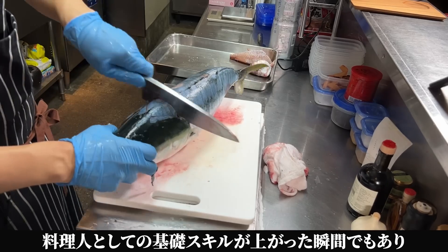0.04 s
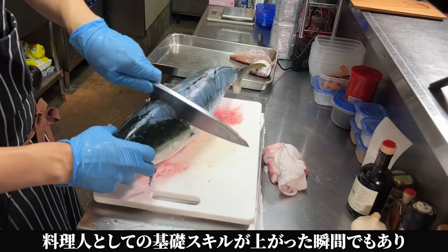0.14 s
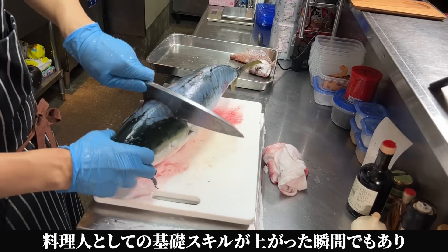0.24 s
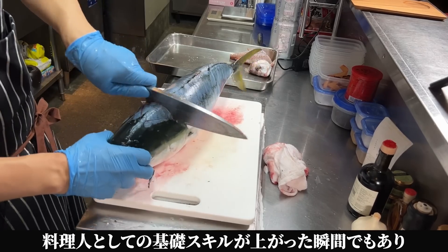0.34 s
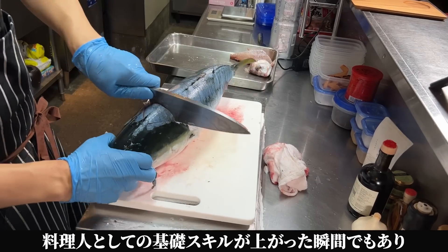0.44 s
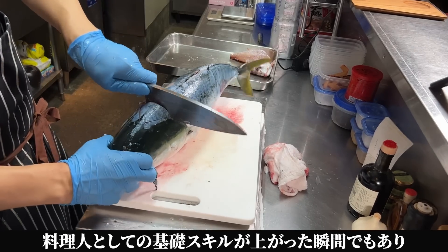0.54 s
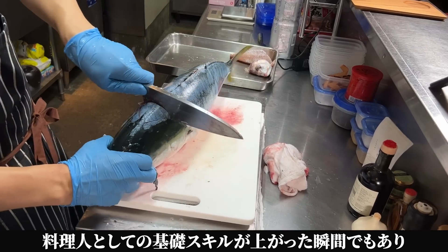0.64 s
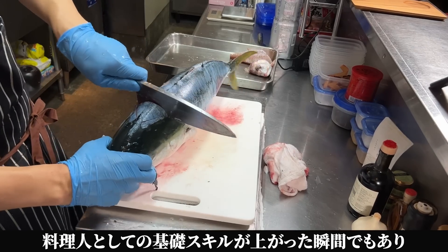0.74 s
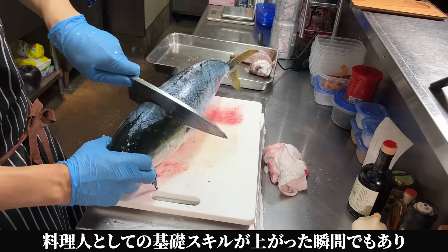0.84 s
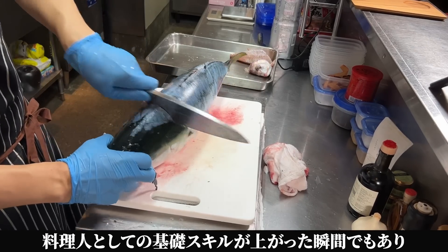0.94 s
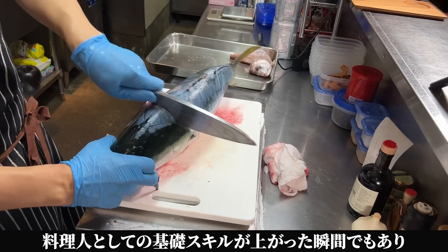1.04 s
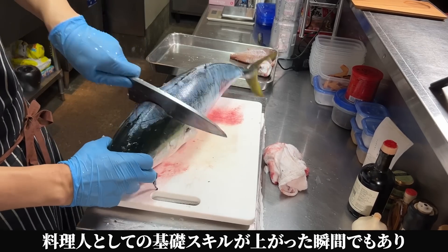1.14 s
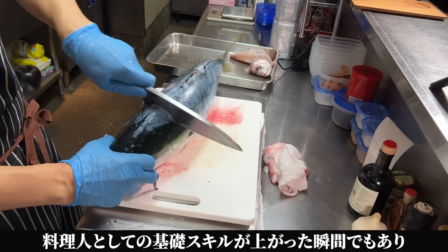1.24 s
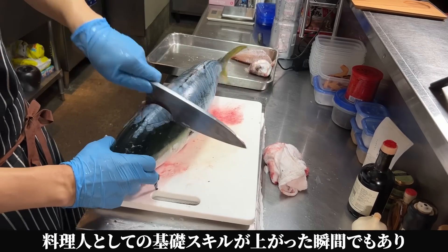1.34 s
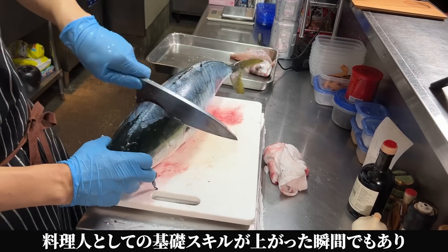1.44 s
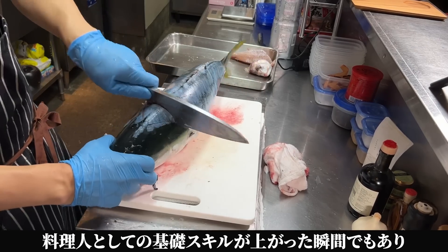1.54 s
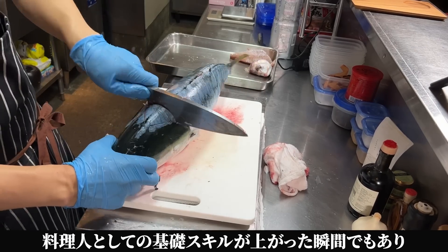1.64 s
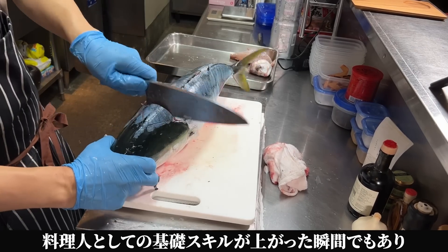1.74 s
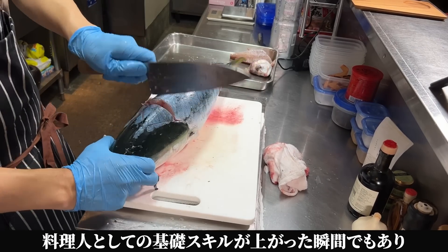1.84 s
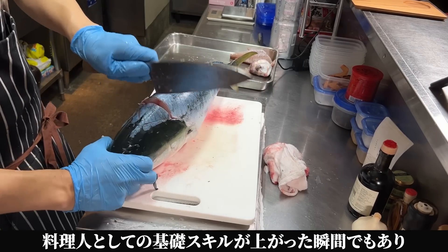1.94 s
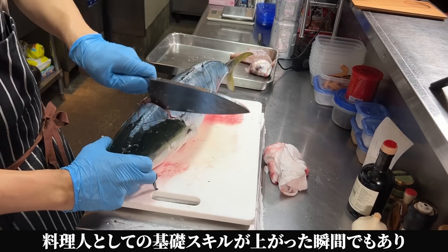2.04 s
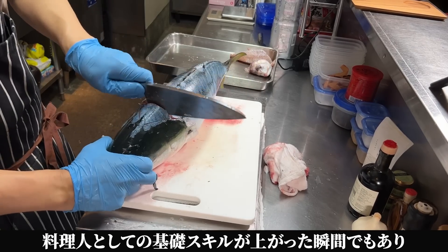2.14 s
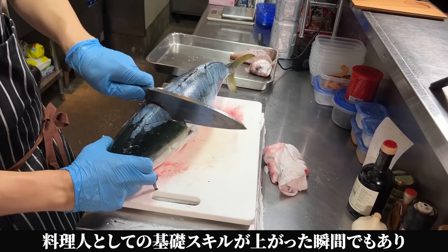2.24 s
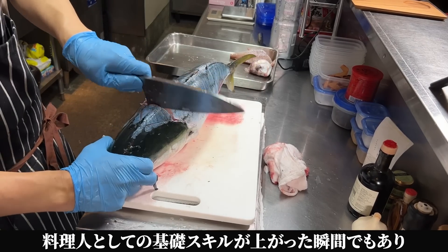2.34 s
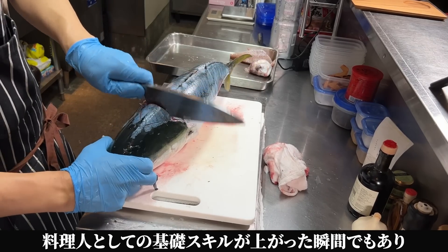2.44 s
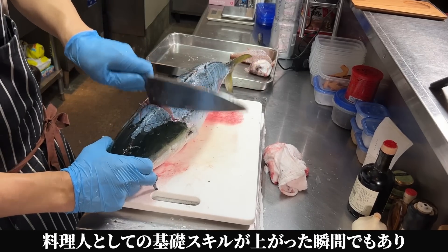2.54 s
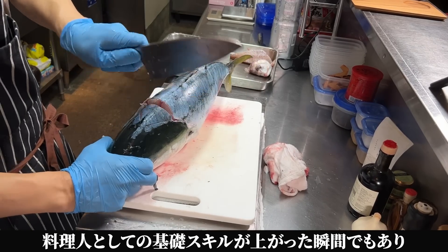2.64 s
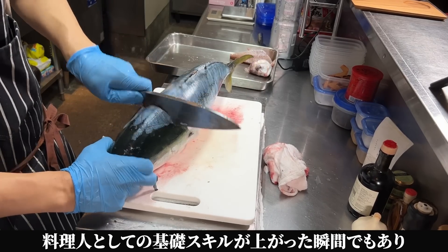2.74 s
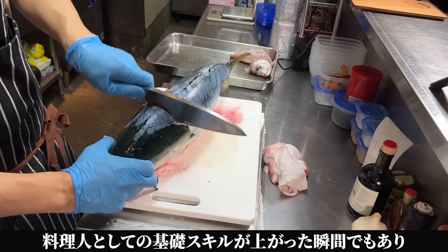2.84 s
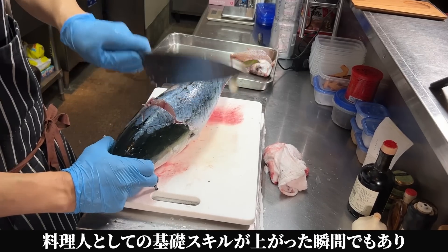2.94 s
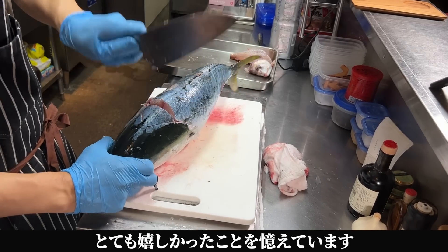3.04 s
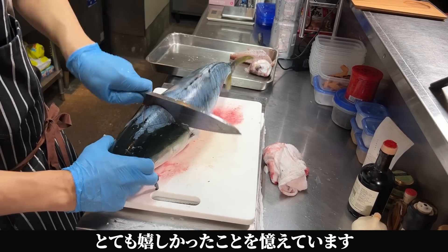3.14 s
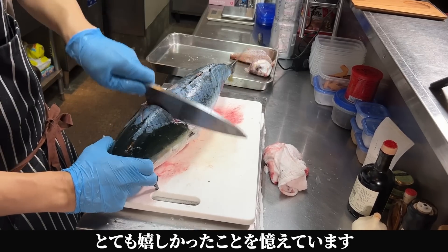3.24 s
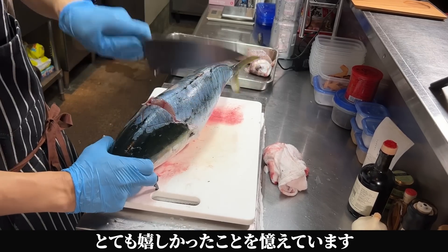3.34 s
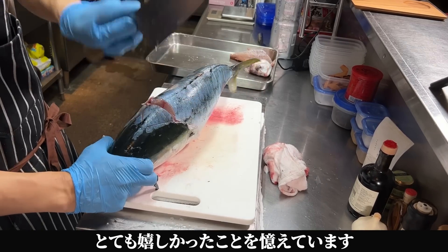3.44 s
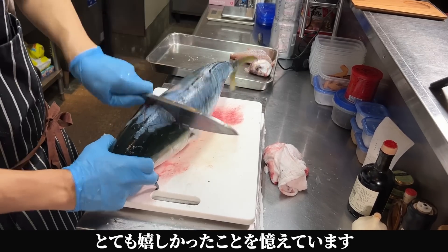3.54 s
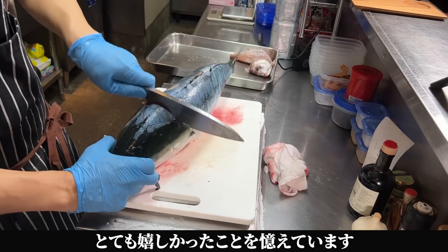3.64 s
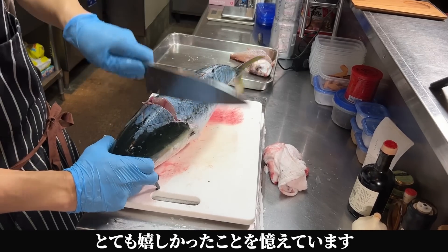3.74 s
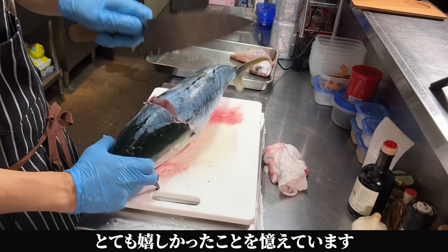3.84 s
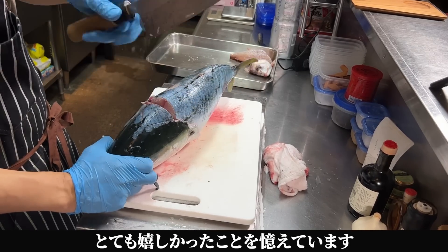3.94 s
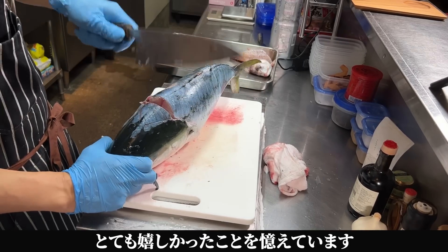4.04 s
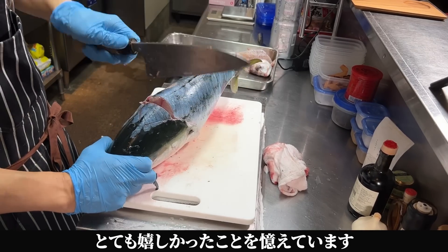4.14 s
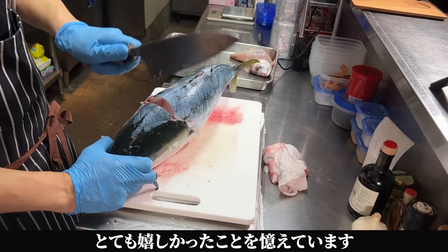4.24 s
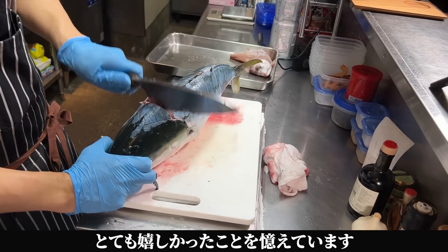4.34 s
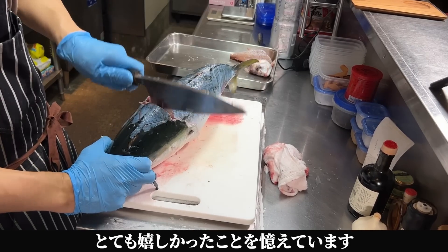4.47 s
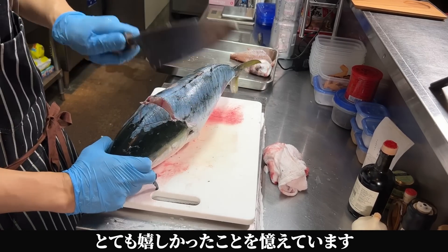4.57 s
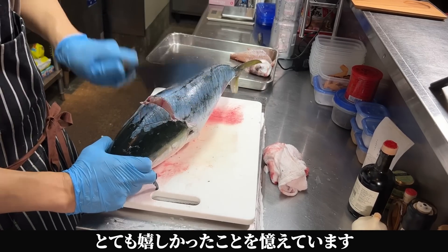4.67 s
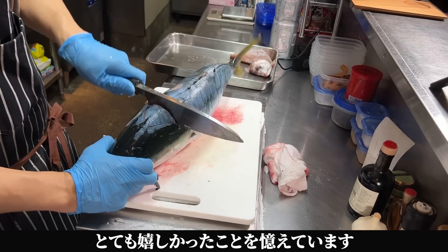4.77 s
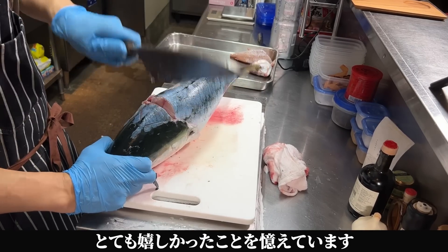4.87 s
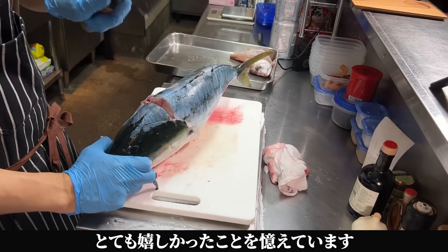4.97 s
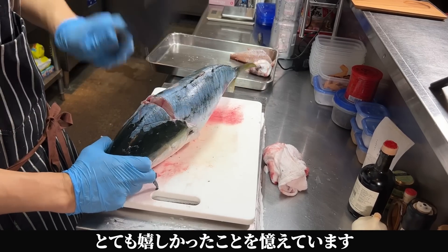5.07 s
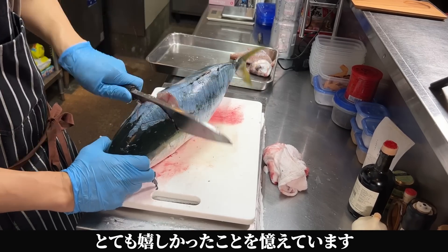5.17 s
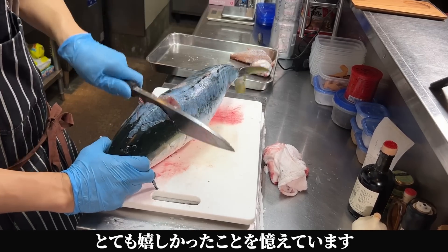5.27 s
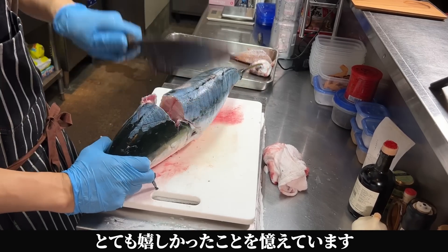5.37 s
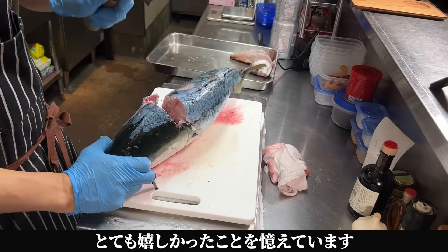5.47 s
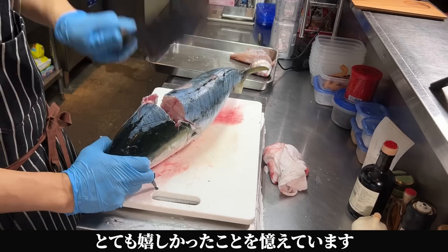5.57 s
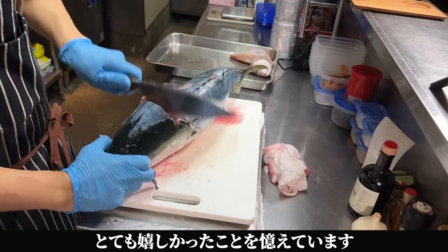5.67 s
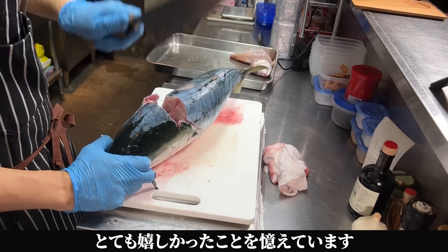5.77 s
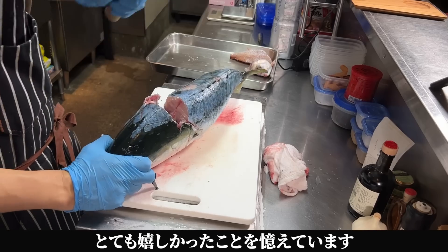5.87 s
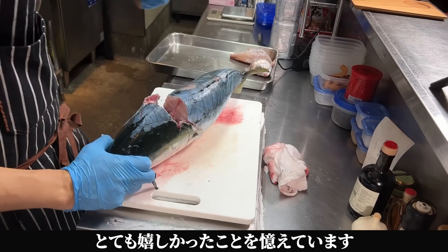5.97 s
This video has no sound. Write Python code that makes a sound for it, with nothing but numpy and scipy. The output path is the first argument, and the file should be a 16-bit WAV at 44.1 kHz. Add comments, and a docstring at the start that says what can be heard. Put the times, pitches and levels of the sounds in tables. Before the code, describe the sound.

A low refrigerator hum and the soft rush of an extractor fan run throughout in a small hard-walled kitchen. From about 0.3 to 1.5 seconds, a knife blade makes faint wet ticks and short scrapes on fish skin, with a soft nudge on the board near 1.1 and another tick at 2.5. Three close, hard chops crack into the backbone at 2.7, 3.1 and 3.5 seconds, growing louder. A faint scrape follows near 4.0, then a tick and light knock at 4.4. Three more chops land at 4.7, 5.1 and 5.6 seconds. Those at 3.5 and 5.1 are the loudest; the last is thinner, with little weight. Each chop is a sharp splintering crack with a wet slap, a quick dull clatter of the plastic board and a low thump and shudder from the steel counter, fading in a short room echo.

```python
"""Six hard, cracking chops of a heavy kitchen knife through the backbone of a large fish.
Before and between them the blade ticks and scrapes on wet skin. Each blow splinters bone, thumps the
fish on a plastic board, makes the board clatter and sets the steel counter swaying. Behind it all, a
refrigeration motor hums and an extractor fan rushes in the small hard-walled kitchen."""
import sys
import numpy as np
from scipy import signal
from scipy.fft import rfft, irfft, next_fast_len
from scipy.io import wavfile
from scipy.ndimage import uniform_filter1d, map_coordinates

SR = 44100
rng = np.random.default_rng(int(sys.argv[2]) if len(sys.argv) > 2 else 0)


def log_audio(samples):
    """Write samples as a 16-bit WAV file to the path given in sys.argv[1]."""
    # one column per channel
    frames = np.atleast_2d(samples).T
    # limit to full scale, then quantise
    limited = np.clip(frames, -1, 1)
    pcm = np.round(limited * 32767).astype(np.int16)
    wavfile.write(sys.argv[1], SR, pcm)


N = 265041
TIME = np.arange(N) / SR
HIT_TIME = np.arange(SR // 4) / SR

# resonances of the plastic board: pitch_hz, width_hz, level_db
BOARD_MODES = [(252, 74, 0), (376, 120, -1.5), (506, 42, -7), (715, 20, 1), (903, 123, 3), (980, 130, 6.5),
               (1200, 320, -5), (1413, 76, -9.5)]
# tone of splintering bone, also of the flesh under a tick: freq_hz, level_db
SPLINTER_EQ = [(400, -24), (1200, 6.5), (1700, 3.5), (2500, -1), (4500, -2), (6500, -8.5), (9000, -9),
               (15000, -22)]
# tone of a bright snap or wet slap: freq_hz, level_db
SNAP_EQ = [(1000, -4.5), (3500, 1.5), (5500, 2.5), (8000, -5.5), (11000, -4.5), (16000, -11)]
# tone of fish and board knocking: freq_hz, level_db
THUD_EQ = [(80, -12), (190, -3.5), (330, -0.5), (550, -1.5), (1000, 2.5), (1500, -0.5), (2100, -7.5),
           (2900, -4), (4500, -17.5), (15000, -38)]
# strokes through the backbone: start_s, crack_db, rise_s, through_bone_s, far_crack_db, far_ring_hz,
# knock_db, knock_hz, ring_db, ring_hz, snap_db, weight_db, landing_db, bounce_db, board_flight_s
# (knock_db, ring_db and snap_db are offsets from crack_db)
CHOPS = [(2.7422, -21, 0.0044, 0.0085, -18.5, 1580, 7, 783, -11, 3960, 0, -21.5, -29, -27.5, .034),
         (3.1126, -17.5, 0.0015, 0.0093, -20, 1620, 7.5, 1140, -5, 2660, 5, -12, -17.5, -27.5, .045),
         (3.5164, -9.5, 0.0023, 0.0062, -16.5, 2250, 3, 787, 8, 2670, -6.5, -7, -12, -16.5, 0.042),
         (4.7045, -15.5, 0.0023, .0063, -17, 1490, 8, 900, 8, 2900, -0.5, -9.5, -13, -17, .041),
         (5.1190, -8.5, 0.00093, .0052, -10, 3210, 4.5, 763, 2, 2300, 4.5, -14, -14.5, -23, .0415),
         (5.6383, -15, 0.00094, 0.012, -25.5, 2750, -7, 1190, 6, 3430, 2, -20.5, -22.5, -38, .0605)]
# the fish is pressed or nudged on the board: start_s, knock_db, brightness_db, weight_db
NUDGES = [(1.067, -37, -7, -31), (4.441, -31, -10, -45)]


def amp(db):
    """Decibels to gain."""
    return 10 ** (np.asarray(db) / 20)


def unit(x):
    """Scale to rms 1."""
    return x / np.sqrt(np.mean(x ** 2) + 1e-20)


def along(points, hz):
    """Read a curve of (freq_hz, value) points on a log frequency axis."""
    freqs, values = np.transpose(points)
    return np.interp(np.log(hz + 1), np.log(freqs + 1), values)


def fade(t, t60):
    """A decay of 60 dB in t60 seconds."""
    return np.exp(-np.log(1000) * t / np.maximum(t60, 1e-3))


def add(track, start_s, sound):
    """Mix a sound into the track."""
    part = track[max(round(start_s * SR), 0):][:len(sound)]
    part += sound[:len(part)]


def wobble(rate_hz):
    """A smooth random curve through rate_hz points a second."""
    return map_coordinates(rng.standard_normal(int(N * rate_hz / SR) + 4), [TIME * rate_hz])


def colour(x, eq):
    """Minimum-phase EQ of unit power: nothing rings ahead of an attack."""
    size = 2 * next_fast_len(len(x) // 2 + 4096)
    gain = unit(amp(along(eq, np.fft.rfftfreq(size, 1 / SR))))
    cepstrum = irfft(np.log(gain))
    cepstrum[1:size // 2] *= 2
    cepstrum[size // 2 + 1:] = 0
    return irfft(rfft(x, size) * np.exp(rfft(cepstrum)))[:len(x)]


def resonate(x, modes):
    """Unit-power bank of (pitch_hz, width_hz, level_db) resonances in alternating polarity."""
    size = 2 * next_fast_len(len(x) // 2 + 4096)
    f = np.fft.rfftfreq(size, 1 / SR)
    response = sum((-1) ** k * amp(db) * 1j * f * width / (hz * hz - f * f + 1j * f * width)
                   for k, (hz, width, db) in enumerate(modes))
    return irfft(rfft(x, size) * response / np.sqrt(np.mean(abs(response) ** 2)))[:len(x)]


def grains(size, spiky_db):
    """Crackle of rms 1: noise that jumps to a new level every 8 samples."""
    noise = rng.standard_normal(size)
    strength = amp(spiky_db * np.clip(rng.standard_normal(size // 8 + 1), -2, 2))
    return unit(noise * strength.repeat(8)[:size])


def burst(lead_s, rise_s, t60, spiky_db):
    """Crackle that builds until lead_s, then dies away."""
    t = HIT_TIME - lead_s
    return grains(len(t), spiky_db) * np.exp(np.minimum(t, 0) / rise_s) * fade(np.maximum(t, 0), t60)


def ring(hz, t60):
    """One damped resonance, slightly unsteady in phase."""
    drift = 0.023 * np.cumsum(rng.standard_normal(len(HIT_TIME)))
    return np.sin(2 * np.pi * hz * HIT_TIME + drift) * fade(HIT_TIME, t60)


def machines(motor_hz=48.975):
    """A motor hums with faint overtones over the fan's rush, a low rumble and a thin high hiss."""
    # overtones of the refrigeration motor: harmonic_number, level_db
    harmonics = [(3, -55), (4, -54.5), (6, -54), (7, -59.5), (9, -56.5), (10, -52.5), (12, -55.5),
                 (13, -55.5), (18, -54.5), (20, -55.5)]
    # tone of the extractor fan: freq_hz, level_db
    fan_eq = [(20, 3), (60, 2), (140, 5.5), (230, -2), (500, -1.5), (1000, -2), (1650, -5.5), (2000, -9.5),
              (2900, -11.5), (4500, -21), (7500, -32.5), (11000, -32.5), (14000, -31), (16000, -37)]
    phase = 2 * np.pi * motor_hz * TIME + 0.037 * wobble(1.274)
    hum = amp(-18.5 + 0.11 * wobble(10)) * np.cos(phase)
    overtones = sum(amp(db + 1.35 * wobble(3.12)) * np.cos(k * phase + rng.uniform(0, 2 * np.pi))
                    for k, db in harmonics)
    air = amp(-37.5 + 0.15 * wobble(1.6)) * unit(colour(rng.standard_normal(N), fan_eq))
    rumble = unit(resonate(rng.standard_normal(N), [(21.4, 4.4, 5), (73, 9.6, 5), (138, 6, -19)]))
    hiss = unit(resonate(rng.standard_normal(N), [(12650, 550, 0)]))
    return np.sqrt(2) * (hum + overtones) + air + amp(-39) * rumble + amp(-67) * hiss


def kitchen_reverb(x, build_s=0.0012, predelay_s=0.005):
    """Steel and tile scatter each sound into a diffuse tail, every band dying at its own speed."""
    # decay of the room: freq_hz, t60_s
    decay_times = [(100, 0.37), (500, 0.49), (1500, 0.41), (4000, 0.43), (8000, 0.32), (15000, 0.3)]
    frames = dict(fs=SR, nperseg=256, noverlap=192)
    hz, t, spectrum = signal.stft(x, **frames)
    power = uniform_filter1d(abs(spectrum) ** 2, size=3, axis=0)
    lag = t[t < 0.5]
    decay = (fade(lag, along(decay_times, hz)[:, None]) * (1 - np.exp(-lag / build_s))) ** 2
    energy = abs(signal.fftconvolve(power, decay / decay.sum(1, keepdims=True), axes=1))[:, :len(t)]
    scatter = signal.stft(rng.standard_normal(N), **frames)[2]
    tail = signal.istft(scatter * np.sqrt(energy / np.mean(abs(scatter) ** 2)), **frames)[1]
    return np.pad(tail, (round(predelay_s * SR), 0))[:N]


def blade_on_skin(lead_s=0.004):
    """Small wet ticks, crackling scrapes and thin squeaks as the blade finds its place."""
    # blade and glove touch wet skin: start_s, level_db
    touches = [(.474, -30.5), (.9225, -21.5), (.993, -28.5), (1.069, -31), (1.118, -32), (1.16, -32),
               (1.502, -29), (2.457, -32.5), (4.379, -22.5)]
    # the edge scrapes through scales: centre_s, level_db, half_length_s, body_offset_db, squeak_offset_db
    scrapes = [(.285, -64, .018, -5, 6), (.4, -63, .08, -14, -6), (.935, -45, .018, 0, -16),
               (1.1, -47, 0.03, 4, -6), (1.22, -55, .054, -7, -14), (1.506, -49, 0.014, 11.5, -2),
               (3.958, -52, 0.084, -4, -18), (4.384, -47, .0093, -3, -18), (4.438, -53.5, 0.024, 23, -18)]
    # tone of skin and scales: freq_hz, level_db
    skin_eq = [(1000, -10), (3000, -11), (4500, 4.5), (7000, -5.5), (13000, -3), (16000, -10)]
    # faint squeak of the sliding edge: pitch_hz, width_hz, level_db
    squeak_modes = [(9700, 160, -8), (12760, 160, -2)]
    ticks, scrape_env, body_env, squeak_env = np.zeros((4, N))
    for s, db in touches:
        touch = amp(db) * burst(lead_s, rise_s=0.00029, t60=0.016, spiky_db=3.5)
        flesh = amp(-6.5) * colour(touch, SPLINTER_EQ)
        add(ticks, s - lead_s, amp(-18.5) * colour(touch, skin_eq) + flesh)
    for s, db, half_s, body_db, squeak_db in scrapes:
        stroke = amp(db) * np.exp(-((TIME - s) / half_s) ** 2)
        scrape_env += stroke
        body_env += amp(body_db) * stroke  # firm pressure drives the board too
        squeak_env += amp(squeak_db) * stroke
    body = amp(-2.5) * colour(grains(N, spiky_db=6), THUD_EQ)
    body += amp(-7) * resonate(grains(N, spiky_db=5), BOARD_MODES)
    scales = colour(grains(N, spiky_db=10), skin_eq)
    squeak = resonate(rng.standard_normal(N), squeak_modes)
    return ticks + scrape_env * scales + body_env * body + squeak_env * squeak


def counter_loads(lag_s=0.0034):
    """The weight of each stroke, landing and nudge meets the counter: start_s, thump_db, sway_db."""
    for s, _, _, through_s, *_, weight_db, _, _, flight_s in CHOPS:
        pushed_s = s + through_s + lag_s  # just after the bone parts
        sway_db = -12.5 + 0.34 * weight_db
        yield pushed_s, weight_db, sway_db
        yield pushed_s + flight_s, weight_db - 8, sway_db - 13
    for s, _, _, weight_db in NUDGES:
        yield s + lag_s, weight_db, weight_db + 6


def steel_counter(sway_hz=18.6, sway_peak_s=0.11, attack_s=0.0055):
    """The steel top thumps at once; the whole counter then rocks on its legs."""
    # resonances of the top under the board: pitch_hz, level_db, t60_s
    top_modes = [(107, -4, 0.11), (131.4, -2, 0.14), (150.4, 1, 0.1), (187, 5.5, 0.03)]
    out, t = np.zeros(N), np.arange(SR * 3 // 4) / SR
    thump = -sum(amp(db) * np.sin(2 * np.pi * hz * t) * fade(t, t60) for hz, db, t60 in top_modes)
    thump *= 1 - np.exp(-t / attack_s)
    swell = (t / sway_peak_s * np.exp(1 - t / sway_peak_s)) ** 2
    sway = swell * np.cos(2 * np.pi * sway_hz * t)
    for s, thump_db, sway_db in counter_loads():
        add(out, s, amp(thump_db) * thump + amp(sway_db) * sway)
    return out


def board_knocks(bounce_gap_s=0.01, bounce_loss_db=8):
    """Four knocks to a stroke, one to a nudge: start_s, level_db, brightness_db, t60_s."""
    for s, _, _, through_s, *_, land_db, bounce_db, flight_s in CHOPS:
        yield s + 3.1 * through_s, land_db - 3.5, 1, 0.075  # the board is driven down
        yield s + flight_s, land_db, 0, 0.041  # it lands after flying up
        for k in range(2):  # and bounces twice
            yield s + flight_s + (k + 1) * bounce_gap_s, bounce_db - k * bounce_loss_db, 0, 0.1
    for s, db, bright_db, _ in NUDGES:
        yield s, db, bright_db, 0.075


def board_clatter(lead_s=0.01):
    """Board and fish jump and land again in dull knocks, each with a wet slap."""
    out = np.zeros(N)
    for s, db, bright_db, t60 in board_knocks():
        thud = colour(burst(lead_s, rise_s=0.0014, t60=t60, spiky_db=1.5), THUD_EQ)
        board = resonate(burst(lead_s, rise_s=0.00027, t60=0.68 * t60, spiky_db=0.5), BOARD_MODES)
        slap = colour(burst(lead_s, rise_s=0.00079, t60=0.9 * t60, spiky_db=2), SNAP_EQ)
        knock = amp(-1) * thud + amp(-3) * board + amp(bright_db - 14.5) * slap
        add(out, s - lead_s, amp(db) * knock)
    return out


def bone_crack(rise_s, t60, knock_db, knock_hz, ring_db, ring_hz, snap_db, lead_s):
    """The edge tears in and bone splinters; where it lands sets the pitch of the knock and the ring."""
    # resonances of the blade in bone: pitch_hz, width_hz, level_db
    bone_modes = [(1620, 160, 3), (1930, 82, -16), (2310, 52, 8), (2517, 33, 10), (2780, 110, 10),
                  (3400, 160, -13), (3740, 140, -6)]
    splinters = amp(1) * colour(burst(lead_s, rise_s, t60, spiky_db=0.5), SPLINTER_EQ)
    bone = amp(-7) * resonate(burst(lead_s, rise_s, 1.3 * t60, spiky_db=5.5), bone_modes)
    board = amp(knock_db - 6.5) * resonate(burst(lead_s, rise_s, 0.5 * t60, spiky_db=-8.5), BOARD_MODES)
    snap = amp(snap_db) * colour(burst(lead_s, rise_s, t60, spiky_db=2), SNAP_EQ)
    crack = splinters + bone + board + snap
    # flesh damps both rings within a few dozen cycles
    rings = amp(knock_db + 0.5) * ring(knock_hz, t60=0.036) + amp(ring_db) * ring(ring_hz, t60=0.021)
    add(crack, lead_s - 0.001, rings)
    return crack


def knife_chops(lead_s=0.015):
    """Each stroke breaks the near side of the bone; the far side gives way at once and sounds duller."""
    out = np.zeros(N)
    for (s, db, rise_s, through_s, far_db, far_hz,
         knock_db, knock_hz, ring_db, ring_hz, snap_db, *_) in CHOPS:
        near = bone_crack(rise_s, t60=0.03, knock_db=knock_db, knock_hz=knock_hz,
                          ring_db=ring_db, ring_hz=ring_hz, snap_db=snap_db, lead_s=lead_s)
        far = bone_crack(rise_s=0.00057, t60=0.038, knock_db=3.5, knock_hz=1042,
                         ring_db=6, ring_hz=far_hz, snap_db=-7.5, lead_s=lead_s)
        add(out, s - lead_s, amp(db) * near)
        add(out, s + through_s - lead_s, amp(far_db) * far)
    return out


def scene():
    """Knife work and its room tail over the bed of machines, in mono."""
    chops, clatter, skin = knife_chops(), board_clatter(), blade_on_skin()
    reverb = kitchen_reverb(amp(-11) * (chops + clatter) + amp(-8.5) * skin)
    return (chops + clatter + skin + steel_counter() + reverb + machines())[None]


def record(dry, top_hz=15900):
    """A soft clip flattens the loudest cracks at full scale; a steep low-pass cuts the very top."""
    clipped = dry / (1 + abs(dry) ** 12) ** (1 / 12)
    size = next_fast_len(N + SR // 4)
    rolloff = 1 + (np.fft.rfftfreq(size, 1 / SR) / top_hz) ** 300
    return irfft(rfft(clipped, size) / rolloff, size)[..., :N]


dry = scene()
out = record(dry)
log_audio(out)
```